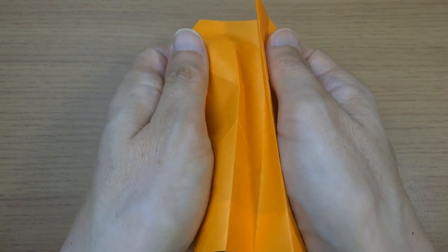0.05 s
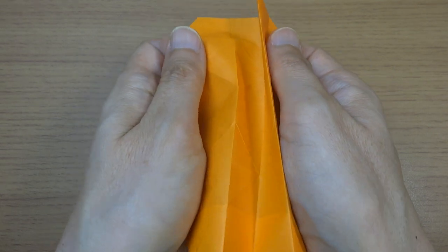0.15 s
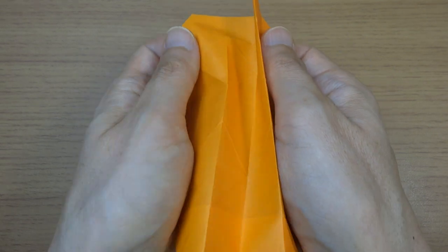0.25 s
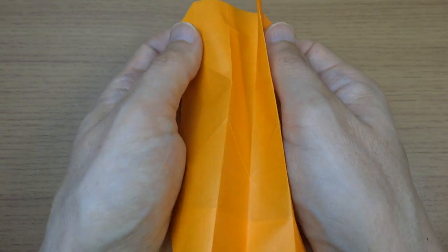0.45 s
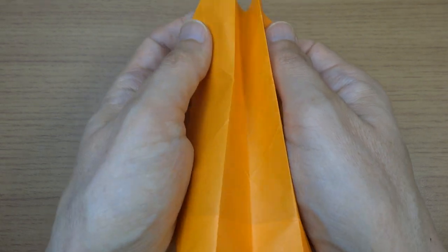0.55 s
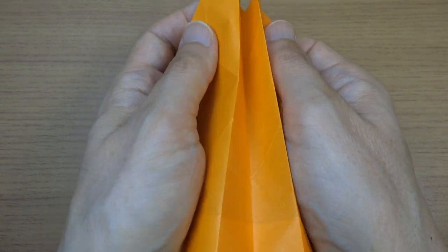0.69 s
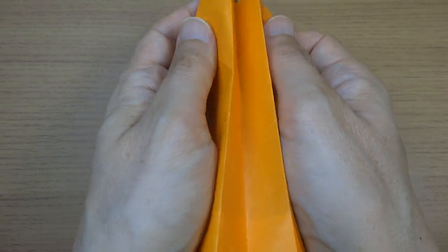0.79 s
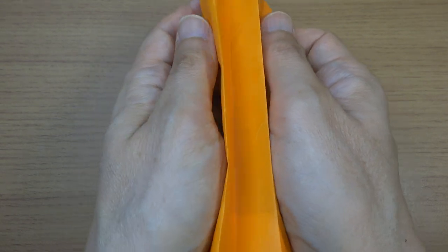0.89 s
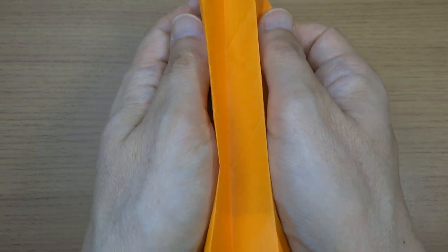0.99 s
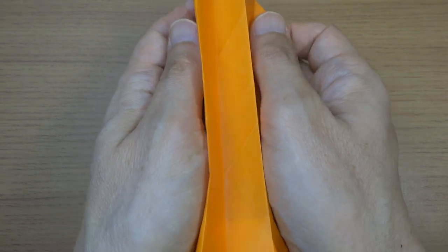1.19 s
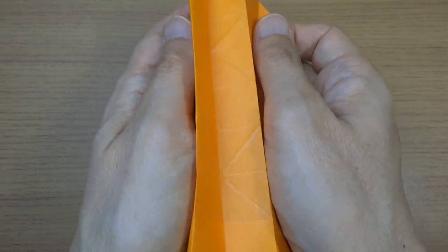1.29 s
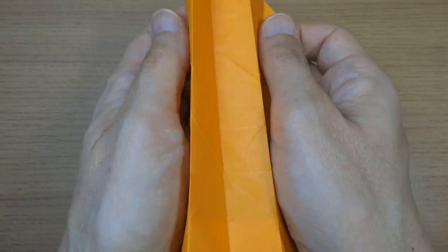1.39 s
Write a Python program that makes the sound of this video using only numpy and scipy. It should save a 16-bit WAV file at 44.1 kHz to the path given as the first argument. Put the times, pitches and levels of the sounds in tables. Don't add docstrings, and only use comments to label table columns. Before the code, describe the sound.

Stiff paper crackles under pressing fingers, close and dry. Nearly quiet at first, then light rubbing and ticks from 0.2 s, a strong snap at 0.32, fine ticks near 0.5 and the brightest crack at 0.55. Pinched snaps follow at 0.7 to 0.74, softer ones at 0.81 and 0.88. Quiet room hush remains, with faint ticks and a soft flex at 1.44.

```python
import sys
import numpy as np
from scipy import signal
from scipy.fft import rfft, irfft, next_fast_len
from scipy.io import wavfile
from scipy.ndimage import uniform_filter1d

SR = 44100
rng = np.random.default_rng(int(sys.argv[2]) if len(sys.argv) > 2 else 0)


def volts_from_db(level):
    exponent = np.asarray(level, float) / 20
    return 10 ** exponent


def output_pcm(signal):
    pcm = np.clip(np.atleast_2d(signal).T, -1, 1) * 32767
    wavfile.write(sys.argv[1], SR, np.round(pcm).astype(np.int16))


N = 63945


def unit(x):
    return x / np.sqrt(np.mean(x ** 2) + 1e-20)


def along(points, hz):
    f, value = np.transpose(points)
    return np.interp(np.log(hz + 1), np.log(f + 1), value)


def filtered(x, response):
    size = next_fast_len(x.shape[-1] + 8192)
    spectrum = rfft(x, size) * response(np.fft.rfftfreq(size, 1 / SR))
    return irfft(spectrum, size)[..., :x.shape[-1]]


def patchy(x, depth_db):
    z = signal.stft(x, nperseg=256)[2]
    field = rng.standard_normal(z.shape[-2:])
    field = uniform_filter1d(field, size=6, axis=0)
    field = uniform_filter1d(field, size=10, axis=1)
    return signal.istft(z * volts_from_db(depth_db * unit(field)), nperseg=256)[1][..., :N]


# f/Hz, level/dB per Hz
AIR_SPECTRUM = [(60, -29.5), (150, -21), (330, -11), (900, -9), (1330, -11), (3000, -15), (6000, -26),
                (11500, -35)]
# f/Hz, width/Hz, level/dB
AIR_RESONANCES = [(350, 210, 6), (850, 83, 9.5), (1580, 67, 9), (2920, 400, 3)]
# f/Hz, likeness (-1 to 1)
AIR_LIKENESS = [(60, 0.88), (170, 1), (490, -0.2), (1420, -0.03), (4070, 0.53), (11700, -1)]
AIR_DB = -65.5


def air():
    def shape(f):
        angle = np.arccos(np.clip(along(AIR_LIKENESS, f), -1, 1)) / 2
        peaks_db = sum(db * np.exp(-((f - hz) / width) ** 2) for hz, width, db in AIR_RESONANCES)
        return volts_from_db(along(AIR_SPECTRUM, f) + peaks_db) * [np.cos(angle), np.sin(angle)]

    mid, side = filtered(rng.standard_normal((2, N)), shape)
    return volts_from_db(AIR_DB + 2.5) * unit(np.array([mid + side, mid - side]))


# t/s, level/dB
SLIDE_LEVEL = [ (0, -53), (.07, -66), (.13, -61), (.2, -43.5), (.3, -43), (.35, -38.5), (.42, -49.5),
               (.474, -43.5), (.505, -37), (.515, -52), (.58, -42), (.64, -52.5), (.7, -43), (.78, -48.5),
               (.9, -57.5), (1.0, -71.5), (1.1, -60.5), (1.2, -73)]
# start t/s, end t/s, rise t/s, level/dB
LAST_TOUCH = (1.378, 1.432, .012, -65)
# f/Hz, level/dB per Hz
RUB_SPECTRUM = [(120, -47.5), (200, -20), (984, -2.5), (1130, -3.5), (2770, 0.5), (6680, -1), (10200, -0.5),
                (10900, 1), (11500, -10), (15000, -47.5), (22000, -120)]
GRAINS_PER_S, GRAIN_SPREAD_DB, GRAIN_DB = 5100, 1.5, -4.5
RUB_PATCHY_DB, RUB_SIDE_DB = 3.63, -13


def rubbing():
    t = np.arange(N) / SR
    luck = rng.random((3, N))
    caught = luck[0] < GRAINS_PER_S / SR
    strength = volts_from_db(-GRAIN_SPREAD_DB * np.log(1 - luck[1]))
    clicks = caught * strength * np.sign(luck[2] - .5)
    hiss = rng.standard_normal((2, N))
    rough = np.array([hiss[0] + volts_from_db(GRAIN_DB) * unit(clicks), volts_from_db(RUB_SIDE_DB) * hiss[1]])
    colored = filtered(rough, lambda f: volts_from_db(along(RUB_SPECTRUM, f)))
    mid, side = patchy(colored, RUB_PATCHY_DB)
    start, end, rise, touch_db = LAST_TOUCH
    touch = volts_from_db(touch_db) * np.clip(np.minimum(t - start, end - t) / rise, 0, 1)
    gain = volts_from_db(np.interp(t, *np.transpose(SLIDE_LEVEL))) + touch
    return unit(np.array([mid + side, mid - side])) * gain


# t/s, crack level/dB, flex level/dB, break time t/s
SNAPS = [
    (0.1954, -40, -46, 0.0039),
    (0.3234, -13, -29, .006),
    (0.5547, -6.5, -39, 0.0031),
    (.7045, -18.5, -36, 0.0073),
    (.7070, -25, -27.5, .006),
    (.7366, -10.5, -27, .005),
    (.8146, -34.5, -28, 0.0041),
    (.8800, -27, -28, .0045),
    (1.4428, -53.5, -28.5, 0.0069),
]
# t/s, crack level/dB, facet f/Hz, facet level/dB, flex level/dB
TICKS = [(.2270, -27.5, 9500, -46, -45.5), (.2330, -39, 1450, -26.5, -48), (.2772, -46, 718, -30, -34),
         (.2785, -30.5, 2800, -31.5, -37.5), (0.3226, -47, 1280, -29, -25),
         (0.4798, -32.5, 1880, -32.5, -52), (0.4819, -31.5, 4930, -34, -55), (0.4863, -39, 1960, -28, -50),
         (.4880, -39.5, 3300, -30.5, -50), (0.4941, -34, 1900, -26, -40), (.4965, -41, 3400, -28.5, -35),
         (.5020, -36.5, 5500, -26, -48), (.5760, -34.5, 6500, -30.5, -41), (0.5806, -40, 2940, -28, -45),
         (0.699, -36, 5000, -32.5, -40), (.7640, -38, 2650, -38, -41), (.8405, -51, 3450, -41, -37),
         (0.8575, -40, 2660, -31, -37), (.8690, -45, 7900, -44, -39), (.9815, -52, 780, -47, -53),
         (1.0996, -51, 3050, -46, -48), (0.4771, -33.5, 7600, -35.5, -52), (.8610, -40, 4400, -38, -34),
         (0.5062, -33.5, 8800, -33.5, -58.5)]
# t/s, f/Hz, level/dB, sharpness Q
FACETS = [(.195, 3200, -23, 3.9), (.195, 4200, -33, 3.5), (.195, 1500, -33, 3.5),
          (.323, 8800, -12, 7), (.323, 5650, -17.5, 24), (.323, 2030, -20.5, 5),
          (.323, 10820, -11, 12), (.323, 1300, -24, 4), (.323, 3100, -18.5, 3),
          (.555, 7140, -20.5, 4), (.555, 3500, -5.5, 2.17), (.555, 9800, -16, 5),
          (.555, 350, -39, 3),
          (.7045, 9900, -18.5, 5), (.707, 3830, -27, 5), (.737, 6120, -14, 6), (.737, 2640, -17, 5),
                  (.737, 10100, -14.5, 6), (.737, 460, -24.5, 3), (.737, 1030, -26.5, 5),
                  (.737, 3800, -18, 4), (.815, 7500, -22, 4), (.815, 430, -33, 5.6), (.815, 1090, -24.5, 4),
                  (.815, 4400, -22.5, 4), (.815, 2760, -21, 8), (.88, 5900, -25.5, 6), (.88, 10200, -27, 6),
                  (.88, 2700, -17.5, 8), (.88, 700, -31.5, 2.5), (1.443, 1440, -43, 5),
                  (1.443, 850, -37, 3), (1.443, 2930, -36.5, 3)]
SILENT_DB = -120
TICK_Q, TICK_BREAK_S = 5.2, 0.0061


def breaks():
    bursts = [(*tick, TICK_Q, TICK_BREAK_S) for tick in TICKS]
    for s, crack_db, flex_db, life in SNAPS:
        bursts.append((s, crack_db, 1000, SILENT_DB, flex_db, 1, life))
    for s, hz, db, q in FACETS:
        snap = min(SNAPS, key=lambda row: abs(row[0] - s))
        bursts.append((snap[0], SILENT_DB, hz, db, SILENT_DB, q, snap[3]))
    return np.transpose(bursts)[:, :, None]


# f/Hz, level/dB, t60/s
FLEX_MODES = [(700, -3, 0.027), (1014, -0.5, 0.026), (1500, -6, 0.021)]
# f/Hz, level/dB
CRACK_SPECTRUM = [(300, -41), (1000, -31), (2500, 1.5), (5000, -5.5), (11000, 1.5)]
FLEX_SCATTER_DB, FLEX_DETUNE = 4.5, 0.033
RISE_S, SHIVER_T60_S = 0.000138, 0.044
CRACK_SHIVER_DB, FACET_SHIVER_DB = -11, -7
FACET_KICK = 8.07
STAGGER = .1
LOW_CUT_HZ, PUSH_DB = 395, -23.5


def creases():
    s, crack_db, facet_hz, facet_db, flex_db, sharpness, life = breaks()
    t, f = np.arange(4096) / SR, np.fft.rfftfreq(4096, 1 / SR)
    noise = rng.standard_normal((len(s), 2, len(t)))
    luck = rng.standard_normal((len(s), 2, len(FLEX_MODES)))

    def fall(shiver_db):
        rise = 1 - np.exp(-t / RISE_S)
        return rise * (volts_from_db(-60 * (t / life) ** 2) + volts_from_db(shiver_db - 60 * t / SHIVER_T60_S))

    def low_cut(hz):
        high_pass = -hz ** 2 / (LOW_CUT_HZ ** 2 - hz ** 2 + 1.4j * hz * LOW_CUT_HZ)
        return high_pass ** 2 + volts_from_db(PUSH_DB)

    colored = irfft(rfft(noise[:, 0]) * volts_from_db(along(CRACK_SPECTRUM, f)))
    crack = unit(colored) / 2 * fall(CRACK_SHIVER_DB)

    tearing = noise[:, 1] * fall(FACET_SHIVER_DB) + FACET_KICK * (t == 0)
    width = facet_hz / sharpness
    resonance = 1j * f * width / (facet_hz ** 2 - f ** 2 + 1j * f * width)
    facet = irfft(rfft(tearing) * resonance)
    facet = facet / np.abs(facet).max(axis=1, keepdims=True)

    flex = 0
    for k, (hz, db, t60) in enumerate(FLEX_MODES):
        decay = volts_from_db(db + FLEX_SCATTER_DB * luck[:, 0, [k]] - 60 * t / t60)
        detuned_hz = hz * (1 + FLEX_DETUNE * luck[:, 1, [k]])
        flex = flex + decay * np.sin(2 * np.pi * detuned_hz * t)

    bursts = volts_from_db(crack_db) * crack + volts_from_db(facet_db) * facet + volts_from_db(flex_db) * flex / 2
    is_snap_facet = crack_db == SILENT_DB
    late = STAGGER * life * is_snap_facet * np.abs(luck[:, 0, [0]])
    at = np.round((s + late) * SR).astype(int) + np.arange(len(t))
    out = np.bincount(at.ravel(), bursts.ravel(), N)[:N]
    return filtered(out, low_cut)


# f/Hz, t60/s
ROOM_T60 = [(300, 0.68), (2000, 0.56), (10000, 0.6)]
ROOM_DB, ROOM_GAP_S = -15.5, .006


def room(x):
    hz, t, z = signal.stft(rng.standard_normal((2, SR // 2)), SR, nperseg=256)
    decay = volts_from_db(-60 * t / along(ROOM_T60, hz)[:, None])
    tail = signal.istft(z * decay, SR, nperseg=256)[1]
    late = np.pad(x, (round(ROOM_GAP_S * SR), 0))[None]
    return signal.fftconvolve(late, tail / np.linalg.norm(tail[0]), axes=1)[:, :N]


LEAN_DB = -.35


def scene():
    hush, rub, snap = air(), rubbing(), creases()
    direct = (snap + rub) * volts_from_db([[LEAN_DB], [-LEAN_DB]])
    return direct + volts_from_db(ROOM_DB) * room(snap) + hush


def top_cut(x):
    return signal.sosfilt(signal.butter(12, 12290, fs=SR, output="sos"), x)


TOP_HZ, TOP_EDGE_HZ, TOP_STEP_DB, TOP_FALL_DB_PER_KHZ = 10965, 390, -28.5, -6


def record(dry):
    def top(f):
        step_db = TOP_STEP_DB * np.clip((f - TOP_HZ) / TOP_EDGE_HZ, 0, 1)
        fall_db = TOP_FALL_DB_PER_KHZ * np.clip(f - TOP_HZ, 0, None) / 1000
        return volts_from_db(step_db + fall_db)

    return top_cut(filtered(dry, top))


dry = scene()
out = record(dry)
output_pcm(out)
```